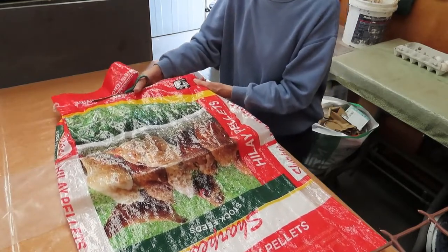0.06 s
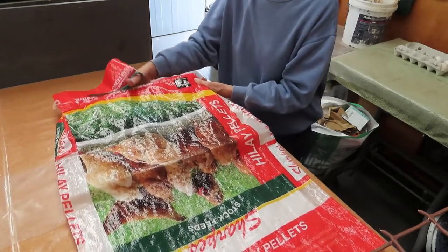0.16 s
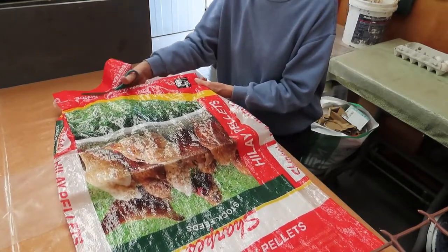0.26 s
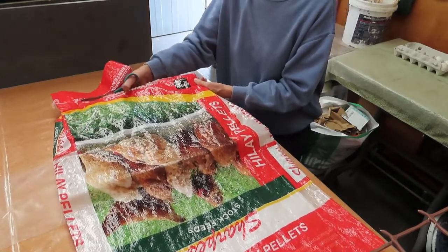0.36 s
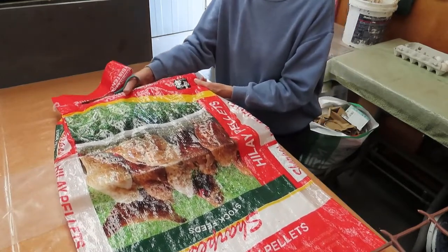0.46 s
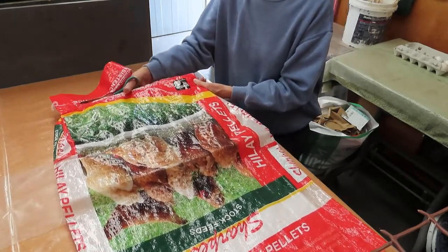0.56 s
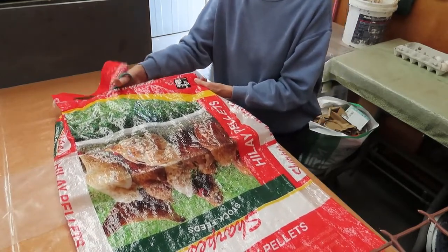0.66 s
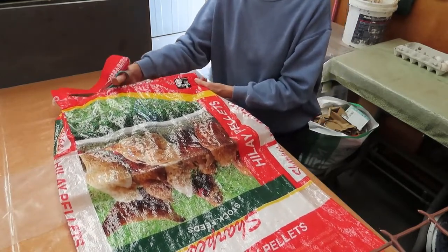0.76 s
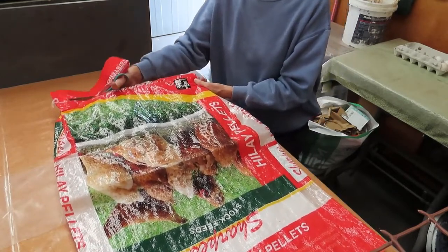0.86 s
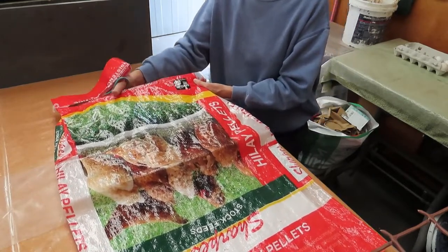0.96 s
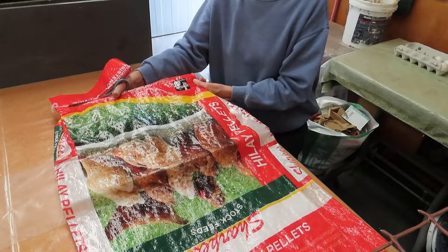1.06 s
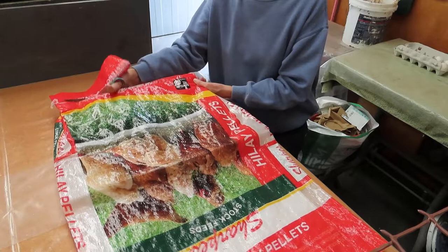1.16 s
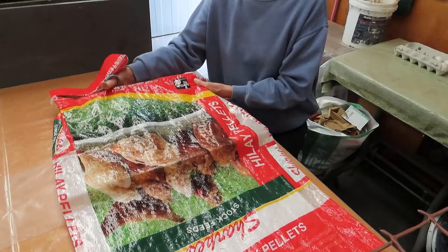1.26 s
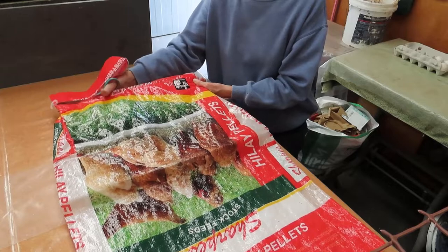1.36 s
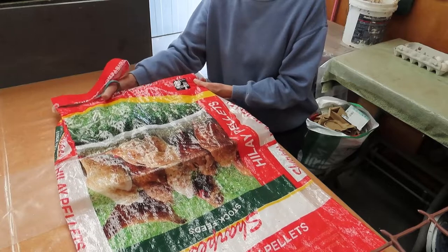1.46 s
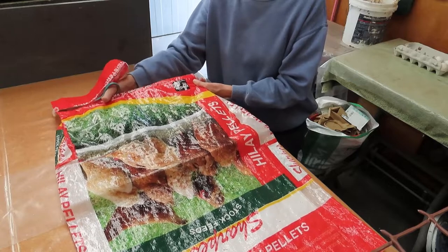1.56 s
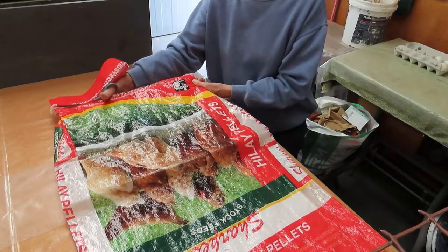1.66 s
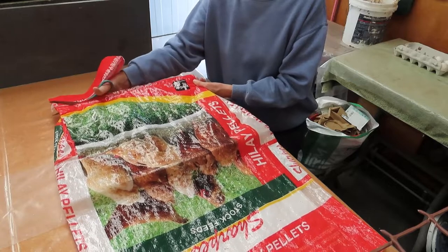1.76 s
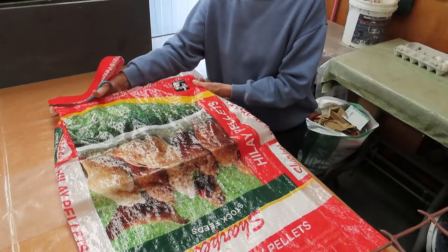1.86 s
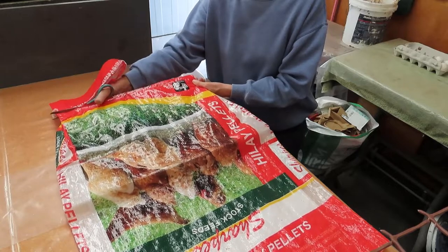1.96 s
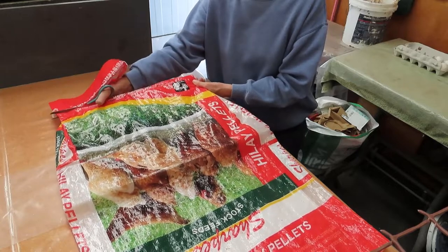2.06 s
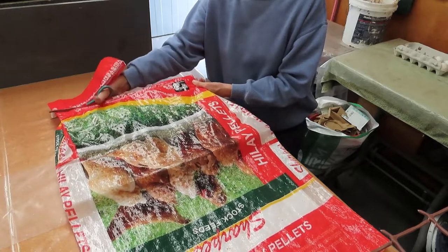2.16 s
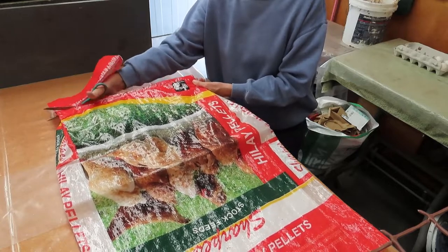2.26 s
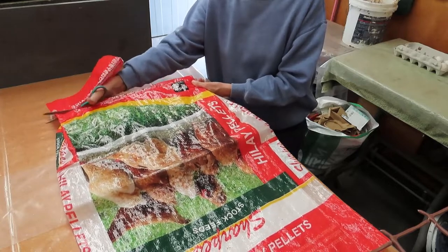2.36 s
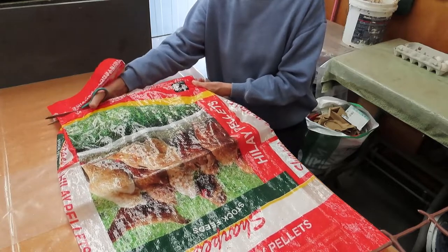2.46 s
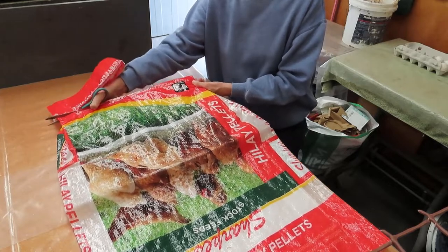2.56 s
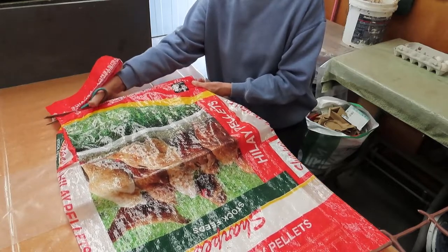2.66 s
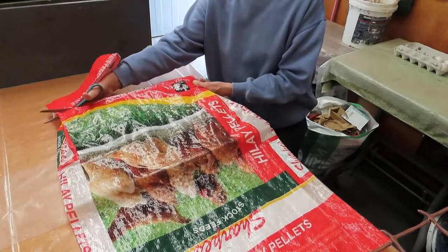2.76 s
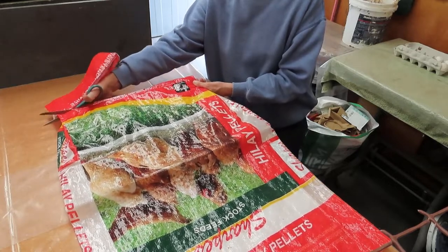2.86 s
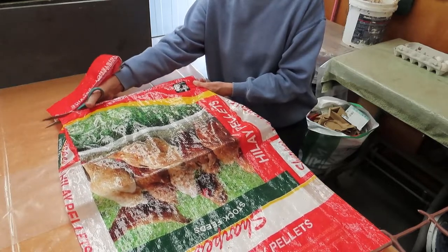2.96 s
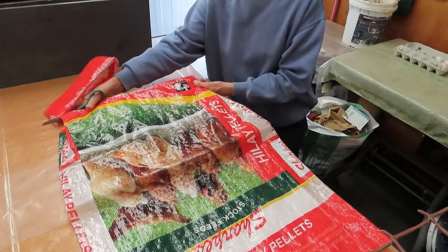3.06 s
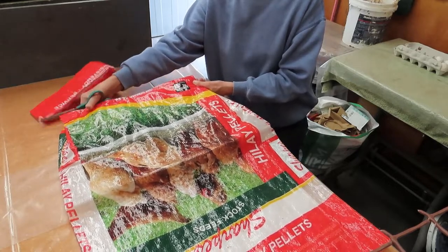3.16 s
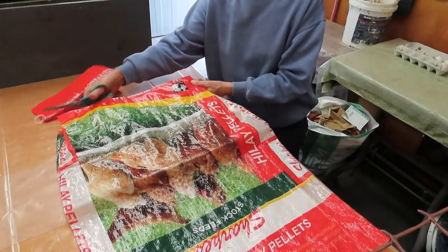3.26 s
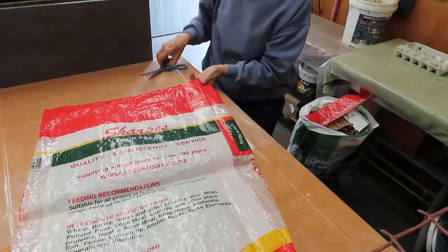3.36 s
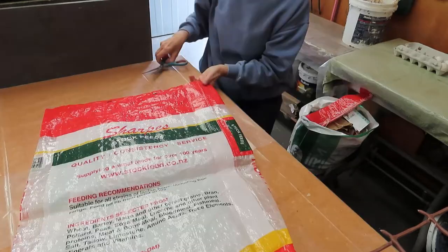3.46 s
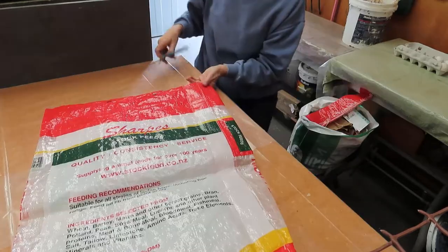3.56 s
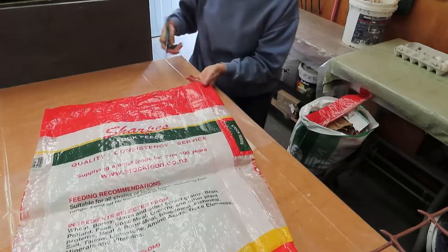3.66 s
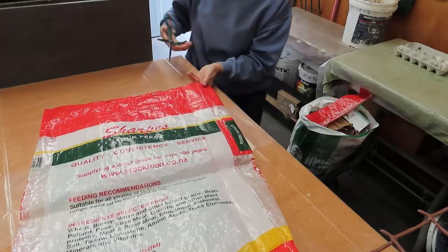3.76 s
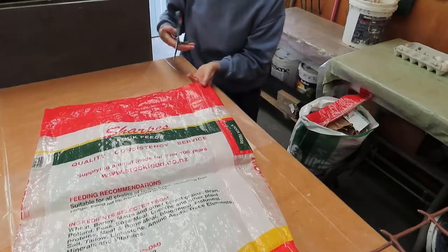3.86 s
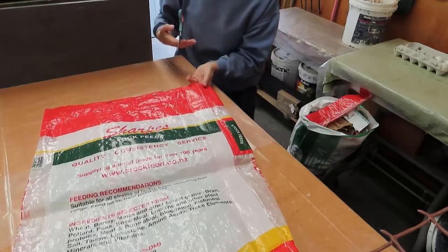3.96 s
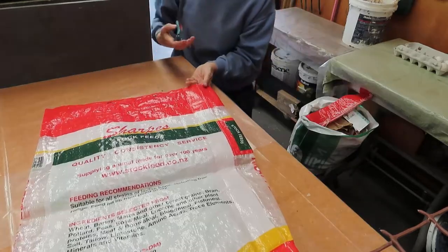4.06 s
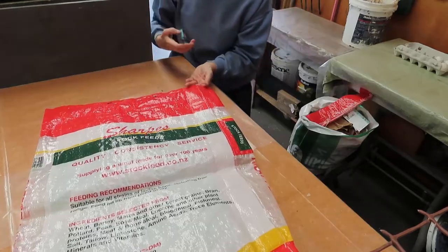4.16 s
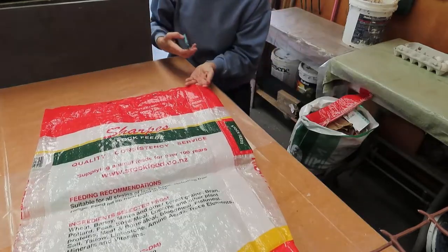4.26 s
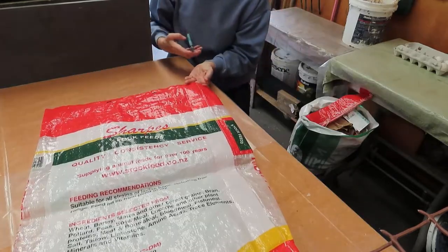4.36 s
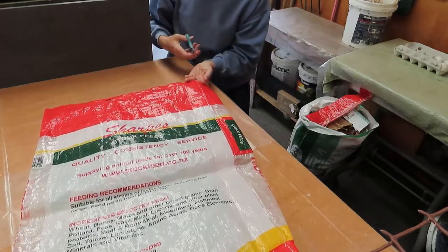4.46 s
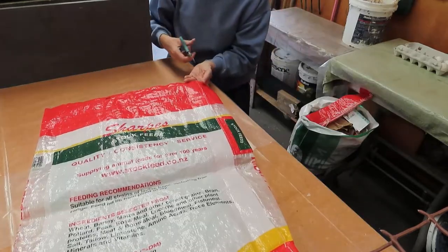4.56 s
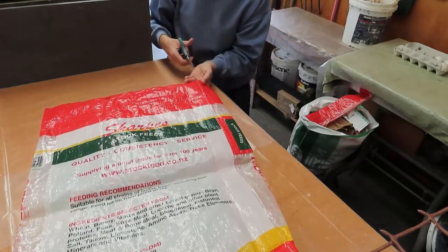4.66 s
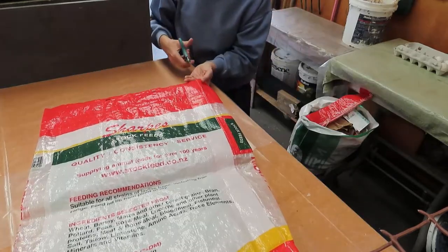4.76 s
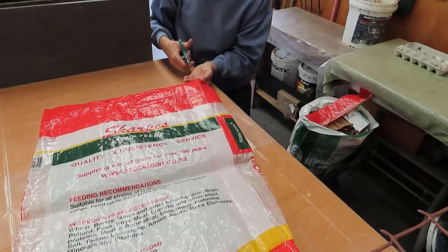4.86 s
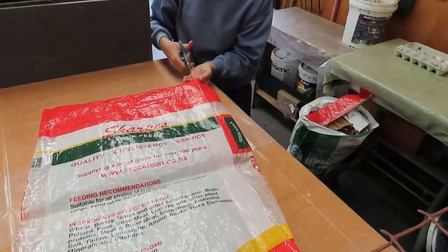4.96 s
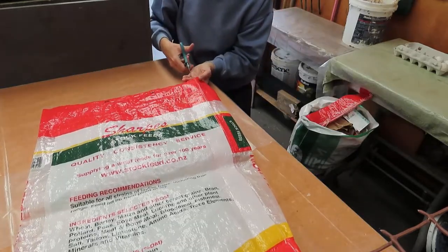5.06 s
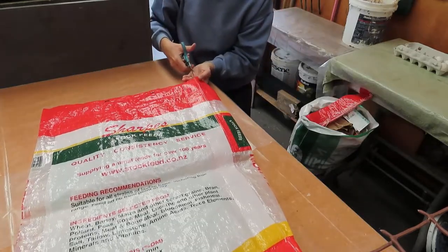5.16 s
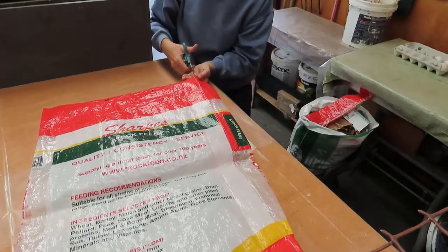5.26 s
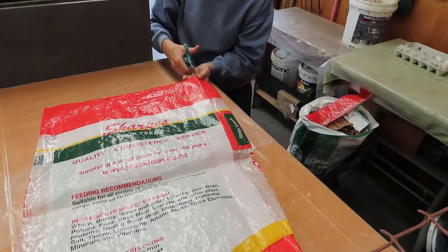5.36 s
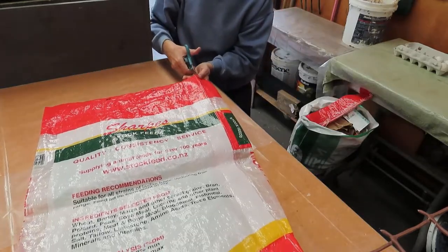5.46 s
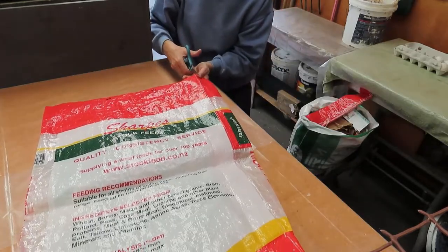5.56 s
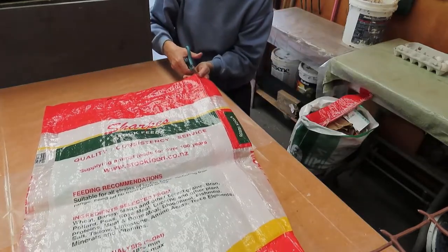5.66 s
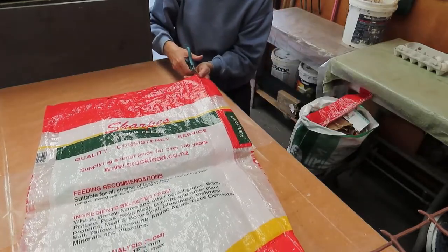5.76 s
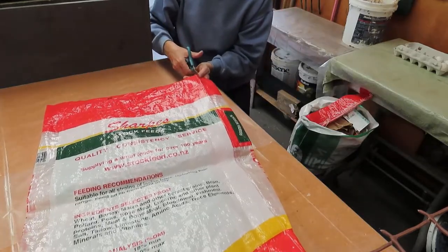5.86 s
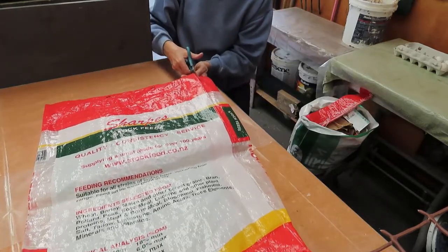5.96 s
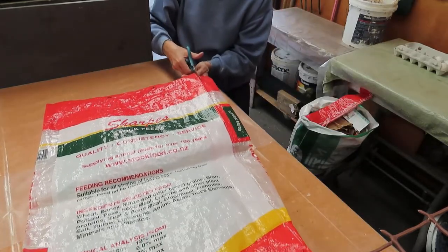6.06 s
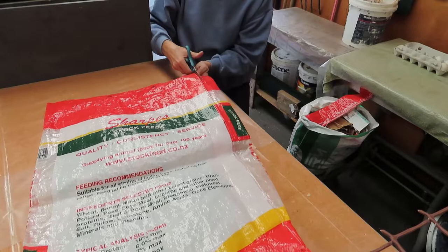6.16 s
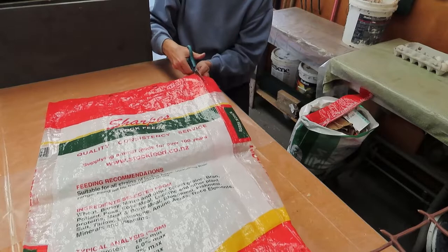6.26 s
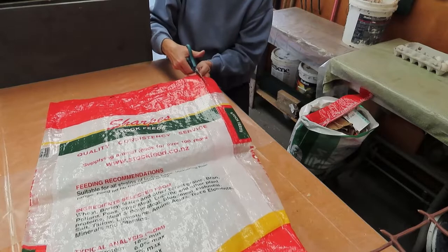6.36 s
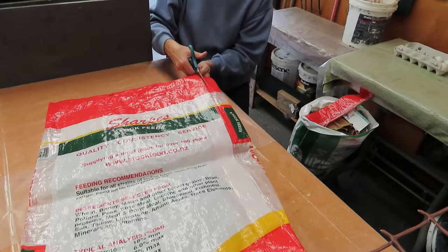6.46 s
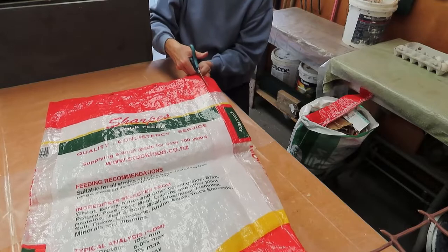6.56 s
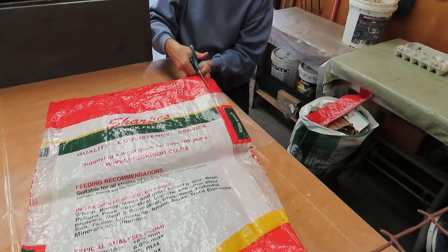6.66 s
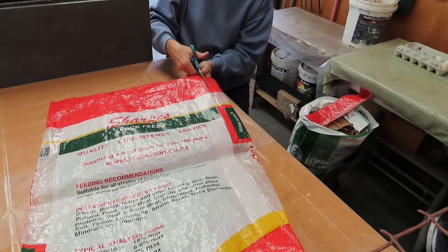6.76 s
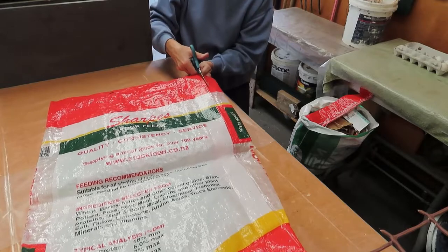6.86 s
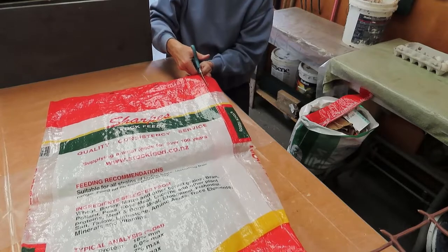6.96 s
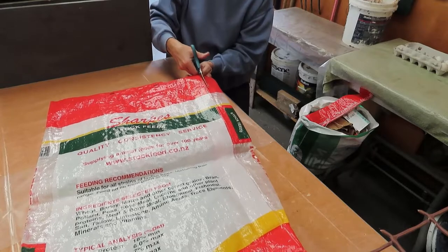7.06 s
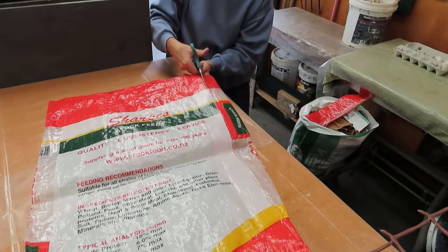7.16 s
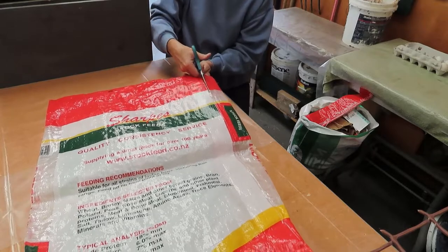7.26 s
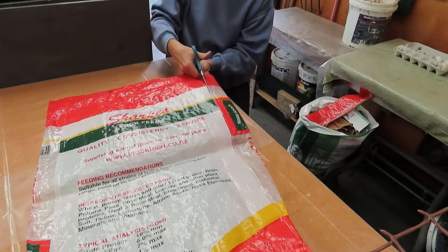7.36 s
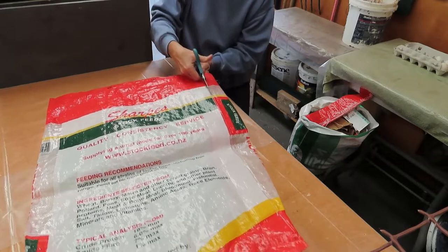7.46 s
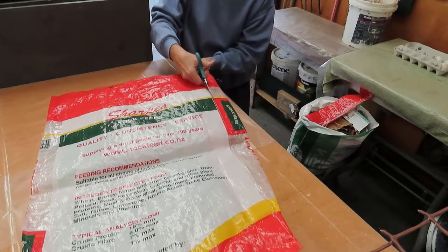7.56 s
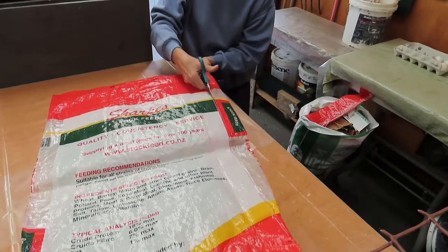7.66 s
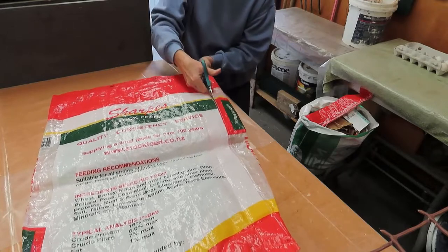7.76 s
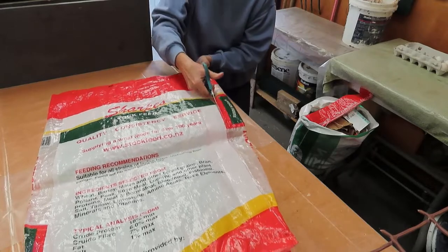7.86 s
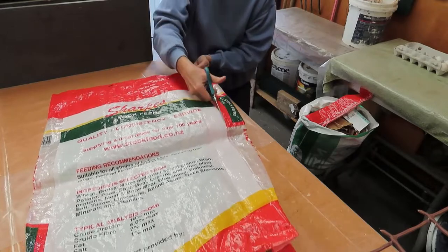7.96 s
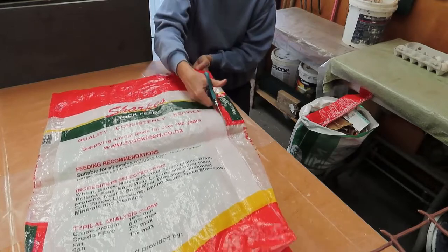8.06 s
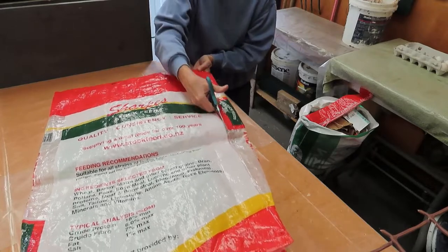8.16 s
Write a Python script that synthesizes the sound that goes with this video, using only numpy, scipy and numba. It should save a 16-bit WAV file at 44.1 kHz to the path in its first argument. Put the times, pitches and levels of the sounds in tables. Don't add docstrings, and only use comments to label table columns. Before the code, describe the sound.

Crisp plastic crackle and thread pops as a stiff sack is cut, a quieter pause while it is turned, then louder snips and dense ripping.

```python
import sys
import numpy as np
from scipy import signal
from scipy.fft import rfft, irfft, next_fast_len
from scipy.io import wavfile
from numba import njit

SR = 44100
rng = np.random.default_rng(int(sys.argv[2]) if len(sys.argv) > 2 else 0)


def convert_level_to_amplitude(level_db):
    exponent = np.asarray(level_db, float) / 20
    return 10 ** exponent


def pcm_store(signal):
    levels = np.round(np.clip(np.atleast_2d(signal), -1, 1) * 32767)
    wavfile.write(sys.argv[1], SR, levels.astype(np.int16).T)


N = 362061

TURNED_S = 3.6
TICK_PER_CREASE = 0.87


def colour(x, points):
    size = next_fast_len(len(x))
    hz, db = np.transpose(points)
    bins_hz = np.arange(size // 2 + 1) * SR / size
    gain = convert_level_to_amplitude(np.interp(np.log(bins_hz + 1), np.log(hz), db))
    return irfft(rfft(x, size) * gain, size)[:len(x)]


def unit(x):
    return x / np.sqrt(np.mean(x ** 2))


@njit
def ring(count, start, hz, cycles, size, place, glide):
    out = np.zeros((2, count))
    for g in range(len(start)):
        tau = cycles * SR / hz[g] / 4
        phase, step = 0., 2 * np.pi * hz[g] / SR
        for k in range(min(int(9 * tau) + 2, count - start[g])):
            fade = np.exp(-k / tau)
            v = size[g] * np.e * k / tau * fade * np.sin(phase)
            phase += step * (1 + glide * fade)
            out[0, start[g] + k] += v
            out[1, start[g] + k] += v * place[g]
    return out


def grains(s, hz, db, place, cycles, glide=0.15):
    start = np.clip(s * SR, 0, N - 1).astype(np.int64)
    return ring(N, start, np.clip(hz, 40, .3 * SR), 1. * cycles, convert_level_to_amplitude(db), place, 1. * glide)


def threads():
    # t/s, boom level/dB, sheet f/Hz, crease level/dB re boom, crease f/Hz
    hem_threads = [(0.3832, -40, 1500.0, 4, 2270.0), (0.3977, -33.0, 1170.0, -8.0, 2730.0),
                   (0.4045, -32, 1210.0, 1.0, 2920), (0.4111, -28.5, 786, 1.5, 2070),
                   (0.422, -34, 720.0, -12, 2980.0), (0.4385, -40, 870.0, 3, 2700.0),
                   (0.4453, -25.5, 770, 0, 2780), (0.461, -37, 1430.0, 1, 2840.0),
                   (0.4639, -27, 720.0, -7, 3600), (0.4838, -25.5, 1360.0, -9.5, 4080),
                   (0.4884, -35, 750.0, 6, 2520.0), (0.498, -42.5, 1440.0, 10, 2180),
                   (0.9208, -41, 1890.0, 2.0, 2170.0), (0.9272, -44.0, 1890.0, 1.0, 2050.0),
                   (0.9313, -29.0, 880, -13, 2220.0), (0.9418, -30, 790.0, -10, 2350.0),
                   (0.948, -31, 1490.0, 1, 2240), (0.952, -39, 1480, -6, 2760.0),
                   (0.9656, -32.5, 1100, 5, 2800), (0.9693, -27, 700, 0.5, 3100),
                   (0.9773, -38, 1890.0, 13.0, 2880), (0.9898, -30, 1090, 1, 3130),
                   (0.9955, -26, 1890.0, -2, 2580), (1.025, -38, 1550.0, 7, 2820.0),
                   (1.0276, -31.5, 760, -5, 2430), (1.0335, -40, 1470, 11, 2380.0),
                   (1.0375, -28, 1310, -14, 2250.0), (1.0426, -37, 1480.0, -1, 3740.0),
                   (1.0486, -45, 1260.0, 3.0, 2700.0), (1.9032, -52.0, 880.0, 6, 2760.0),
                   (1.9068, -53.0, 1390.0, 15, 2830.0), (1.919, -45, 940.0, -5, 3640.0),
                   (1.9224, -49, 720.0, -5.0, 4370.0), (1.9267, -44, 1250.0, -3.0, 4430.0),
                   (1.9373, -33, 1080, 6, 3180), (1.9525, -31, 1080.0, 7, 2440),
                   (1.957, -18, 856, 2.5, 2500.0), (1.9746, -23, 1030.0, -6, 4470),
                   (1.9955, -29, 1350.0, 3.5, 3100), (2.004, -33, 1320.0, 2.0, 3380.0)]
    corner_threads = [(5.9404, -35, 1150.0, -12, 2500.0), (5.9454, -32, 940.0, -15, 2000.0),
                      (5.954, -17, 1100, -13, 2170), (5.9614, -20.5, 1180.0, -5, 2570),
                      (5.9694, -23, 1590.0, -9, 2420.0), (5.9772, -19.5, 1000.0, -15, 1980),
                      (5.9851, -21.5, 990, -4, 2980.0), (5.995, -18, 1320.0, -17, 2490.0),
                      (6.0092, -42, 980, -4, 2730.0), (6.0205, -42, 1060.0, -3.0, 2900),
                      (6.0246, -20.5, 960, -8, 2500.0), (6.0291, -29, 1280, 3, 3080),
                      (6.0351, -21.5, 1550.0, -11, 3090.0), (6.0401, -26, 760, -2, 1980),
                      (6.0548, -44, 1180.0, -12, 2350.0), (6.1143, -28, 1450, -7.0, 2610.0),
                      (6.1199, -15.5, 1010, -19, 2570.0), (6.1286, -34, 925, 1, 3050),
                      (6.1343, -14.5, 920, -20, 2440.0), (6.1436, -18, 1380, -8, 2710.0),
                      (6.1547, -19.5, 920, -7, 2500), (6.1663, -35, 960, 5, 2310),
                      (6.1759, -25, 1890.0, -9, 2050), (6.4416, -25, 770, -10, 2330.0),
                      (6.4486, -24.5, 1433, -10, 2240), (6.4551, -29, 1350.0, -18, 2290.0),
                      (6.4645, -14, 900, -8.0, 2930), (6.4706, -28, 1100.0, 2, 2790.0),
                      (6.4754, -31, 980.0, -6, 2740), (6.4807, -33, 920.0, -1.0, 2900),
                      (6.4871, -40, 1040.0, -4, 3080), (6.4962, -32, 766, -9, 2920),
                      (6.5152, -19.5, 1360, -2, 2940), (6.5197, -29, 1300.0, -7, 3120.0),
                      (6.5276, -31, 1160, 6, 3140), (6.5316, -20, 900, -13, 3000),
                      (6.548, -33, 810.0, 3, 2900.0), (6.555, -21, 1010, -2, 3180),
                      (6.5629, -22, 1520, -11, 3100), (6.5764, -47, 1530.0, -17, 2920.0)]
    rip_threads = [(7.1445, -42.0, 1000.0, 11, 2950.0), (7.1502, -25, 1890.0, 5.5, 2050),
                   (7.1602, -22, 1010, 8.5, 2770), (7.1846, -27, 1380, 13, 3050.0),
                   (7.1891, -26, 850.0, 11.0, 2930), (7.1917, -26, 1420.0, 5, 3330),
                   (7.2001, -25, 1450.0, 8, 2900), (7.2095, -23.5, 1380.0, 4.0, 2820.0),
                   (7.2147, -29, 1130.0, 7, 3000.0), (7.2194, -20, 1710.0, 3, 2850.0),
                   (7.2255, -24.5, 805, 2, 2980.0), (7.233, -18, 850.0, 1, 2750.0),
                   (7.238, -24.5, 860, 0, 2330), (7.2461, -18.5, 770, 2, 2030),
                   (7.253, -22, 1460, -3, 3150.0), (7.258, -30, 1130.0, -13, 1980),
                   (7.2646, -33, 1210.0, -11, 2010.0), (7.3495, -31, 1600.0, -6, 2260),
                   (7.373, -31, 1480.0, -5.0, 2090.0), (7.389, -31, 1030.0, -24, 2700),
                   (7.394, -15, 940, -9, 2420), (7.406, -28.0, 1730.0, 5, 2090.0),
                   (7.4099, -22, 795, -1, 2650), (7.4123, -25, 940.0, 3, 2830.0),
                   (7.4181, -28, 890.0, -2, 2440), (7.4378, -20, 880.0, -10, 2240.0),
                   (7.458, -27, 990.0, -4.0, 2370.0), (7.475, -25.5, 930, -0.5, 2090.0),
                   (7.4829, -28, 920.0, -2, 2300.0), (7.4971, -32, 960.0, 8.5, 2380)]
    glide_threads = [(7.5144, -31, 1040.0, 6, 2080), (7.5333, -27.0, 710, 0, 2330.0),
                     (7.5453, -29, 810, -2, 2620.0), (7.5563, -22.5, 1460.0, -7, 2510.0),
                     (7.5847, -40, 680.0, 14, 2430), (7.6121, -27, 1310.0, -6, 3430.0),
                     (7.6185, -26.5, 1490, -5, 3180), (7.6514, -32, 1890.0, 2, 3350),
                     (7.6675, -21.5, 1530, -4.0, 2220), (7.683, -26, 1600.0, -7, 2000),
                     (7.713, -30.5, 1200.0, 6.5, 3440), (7.7217, -27, 1780.0, 0, 2430.0),
                     (7.7384, -30, 930.0, -11, 3470.0), (7.764, -32.0, 1230.0, 5, 2270),
                     (7.7856, -29, 705, -2.0, 2400.0), (7.803, -28.0, 1230.0, -17, 2440.0),
                     (7.8115, -33, 1510.0, 1.0, 2000.0), (7.838, -37, 1380.0, -10, 3770.0),
                     (7.8517, -22, 760.0, -16, 3220.0), (7.8616, -22.0, 930, -17, 2500.0),
                     (7.8721, -26, 930.0, -7, 2000.0), (7.8887, -30.5, 1820.0, 7, 3610.0),
                     (7.9064, -27, 930, 4, 2250), (7.9187, -28, 1040.0, -8.0, 3790.0),
                     (7.934, -29, 940.0, -1, 2000.0), (7.9574, -23, 730, -2, 2000.0),
                     (7.9724, -24, 840, -9.0, 2010), (8.0832, -23.0, 925, -16, 2520.0),
                     (8.0985, -23.5, 1110, -3, 2810), (8.1078, -29, 970.0, 5, 3420),
                     (8.1178, -23, 1240, -11, 2680.0), (8.1577, -19.0, 720, -7.0, 2390),
                     (8.1674, -21.5, 870, -3, 2540), (8.1956, -19.5, 875, -11.0, 3540)]
    snips = [
        (4.4312, -23.5, 965, -6, 3110),
        (6.3007, -16, 1130, -7, 2770),
        (6.3092, -24.5, 1000, -3, 2500),
        (6.712, -23, 950, -8, 3000),
        (6.7149, -22.5, 980, -1.5, 3120),
        (6.9453, -16.5, 1010, -2, 2900),
    ]
    groups = [(hem_threads, -6.5), (corner_threads, -10.5), (rip_threads, -17.5), (glide_threads, -11),
              (snips, -9.5)]
    out = 0
    for table, tick_db in groups:
        s, db, hz, crease_db, crease_hz = np.transpose(table)
        place, over, low, high, tick = rng.standard_normal((5, len(s)))
        top_db = db + tick_db + TICK_PER_CREASE * crease_db
        overtone_hz = 1.83 * hz * np.exp(0.13 * over)
        low_tick_hz = 5600 * np.exp(0.19 * low)
        high_tick_hz = 9000 * np.exp(0.22 * high)
        out = out + grains(s, hz, db - 2.0, place, cycles=2.47, glide=0.03)
        out += grains(s + 0.000946, overtone_hz, db - 7, place, cycles=2.6)
        out += grains(s - .0002, crease_hz, db + crease_db - 1.5, place, cycles=6.1, glide=0.048)
        out += grains(s - .0003, low_tick_hz, top_db + 1.6 * tick, place, cycles=3.3)
        out += grains(s + .0006, high_tick_hz, top_db - 5, place, cycles=6.8)
    return out


def pop_rows():
    # t/s, boom level/dB, sheet f/Hz, crease level/dB re boom
    hem_pops = [(0.0, -31, 730, -3.5), (0.026, -25.5, 1030, -19), (0.065, -32.5, 1560, -30),
                (0.185, -33, 1130, -11), (0.204, -31, 1380, -11), (0.299, -29, 1720, -10),
                (0.64, -36.5, 1000, 0.5), (0.738, -40, 1220, 3), (1.182, -41, 1060, -15),
                (1.241, -50.5, 1320, 14), (1.247, -30, 784, -26), (1.398, -29, 1090, -1.5),
                (1.416, -37.5, 1100, 2.5), (1.488, -40, 1290, 6), (1.519, -32.5, 1500, -9),
                (1.548, -22, 1410, -5), (1.567, -23, 1430, -7.5), (1.872, -40, 1190, -25),
                (2.082, -35, 770, 2), (2.18, -29.5, 1040, -37), (2.266, -33.5, 1460, -14),
                (2.307, -44, 1180, -0.5)]
    offcut_pops = [(2.434, -29.5, 1370, 5.5), (2.452, -27, 1500, 0), (2.497, -35.5, 1290, 6.5),
                   (2.517, -27, 1150, 2.5), (2.715, -47.5, 1400, 1.5), (2.795, -44, 1030, 1),
                   (2.952, -49, 1190, 8), (2.979, -36.5, 1010, 4), (3.001, -35, 1340, -2),
                   (3.048, -28.5, 1140, 3.5), (3.094, -27, 1290, 1), (3.097, -18, 940, -2),
                   (3.176, -32.5, 1080, -29), (3.291, -48.5, 1100, 12), (3.304, -40.5, 1310, -7),
                   (3.727, -55.5, 1200, 9.5), (3.756, -50.5, 1230, 1), (3.84, -67.5, 1200, 18)]
    corner_pops = [(3.944, -34.5, 960, -8.5), (4.238, -53, 1320, -1.5), (5.216, -46.5, 1540, -4),
                   (5.301, -27.5, 1280, -8), (5.517, -43.5, 820, -15), (5.529, -45, 1010, -8),
                   (5.706, -40.5, 760, -4), (5.739, -30.5, 1020, -1), (5.749, -33, 800, -4),
                   (5.806, -33.5, 850, -2.5), (5.91, -20.5, 1000, -26), (5.926, -38, 1410, -25),
                   (5.936, -21.5, 980, -8), (6.103, -27, 1010, -18), (6.426, -28.5, 1000, -4.5),
                   (6.705, -38.5, 1600, 8), (6.849, -46.5, 1380, -1), (6.941, -36, 1120, 11)]
    rip_pops = [
        (7.132, -33.5, 990, -4),
        (7.147, -25, 1700, 0.5),
    ]
    groups = [(hem_pops, -0.5), (offcut_pops, -1.5), (corner_pops, -5), (rip_pops, -7.5)]
    rows = [np.column_stack([table, np.full(len(table), tick_db)]) for table, tick_db in groups]
    rows = np.concatenate(rows).T
    rows[4] += TICK_PER_CREASE * rows[3]
    return rows


def pops():
    # f ratio re boom, level/dB re boom, crease f/Hz, crease level/dB, tick f/Hz
    splinters = [(2.03, -6.5, 2860, 0.5, 5420), (0.7, -5, 2075, -2, 6450), (1.87, -3, 4350, -0.5, 8060),
                 (1.22, -8.5, 2705, -2.5, 11000)]
    s, db, hz, crease_db, tick_db = pop_rows()
    c = rng.standard_normal((4 * len(splinters) + 1, len(s)))
    place = c[-1]
    out = grains(s + 0.00031, hz, db - .8, place, cycles=2.33, glide=0.1)
    for k, (ratio, boom_db, crease_hz, part_db, tick_hz) in enumerate(splinters):
        delay, boom_vary, crease_vary, tick_vary = c[4 * k:4 * k + 4]
        late = s + .0004 * k * abs(delay)
        part_hz = ratio * hz * np.exp(0.14 * boom_vary)
        note_hz = crease_hz * np.exp(0.1 * crease_vary)
        out += grains(late + 0.00048, part_hz, db + boom_db, place, cycles=2.24)
        out += grains(late, note_hz, db + crease_db + part_db, place, cycles=3.0, glide=0.075)
        out += grains(late, tick_hz * np.exp(0.11 * tick_vary), db + tick_db - 7.5, place, cycles=5.9)
    return out


def handling():
    # start t/s, hold t/s, boom level/dB, crease level/dB re boom, fizz level/dB re boom
    strokes = [(0, 0.059, -45.5, -0.5, -17), (0.169, 0.14, -46.5, 1, -7.5), (0.399, 0.071, -39, -4.5, -7.5),
               (0.633, 0.12, -44, -1, -14.5), (0.92, 0.095, -41, 1.5, -13.5), (1.163, 0.09, -44.5, 2, -15),
               (1.386, 0.058, -48, -7, -8.5), (1.53, 0.15, -54.5, -1, -13),
               (1.709, 0.15, -45.5, -4.5, -14.5), (1.936, 0.028, -33.5, 1, -3),
               (2.194, 0.1, -47.5, 2, -10.5), (2.35, 0.078, -57.5, 3, -4), (2.427, 0.032, -49.5, 5, -3),
               (2.75, 0.03, -53.5, 4.5, -4), (2.882, 0.018, -56, -3, -19), (2.982, 0.078, -49.5, 7, 4.5),
               (3.29, 0.14, -60, 2.5, -3.5), (5.237, 0.25, -51, -8, -22), (5.496, 0.042, -53.5, -3, -20),
               (5.716, 0.086, -68, 5, 10), (5.921, 0.081, -34, -4, -12), (6.122, 0.033, -37.5, 4.5, -6),
               (6.451, 0.1, -36, -1.5, -13), (7.182, 0.065, -35.5, 7, -6.5)]
    # t/s, boom level/dB, crease level/dB re boom
    push_curve = [
        (7.33, -52, -2),
        (7.35, -31.5, -0.5),
        (7.44, -40, 1),
        (7.559, -35.5, 1.5),
        (7.64, -40, 1),
        (7.9, -30, -2.5),
        (8.01, -38, -2.5),
        (8.1, -31.5, -4),
        (8.21, -37, -3.5),
    ]
    rise_db_s, sag_db_s = 696, 12.5
    fall_db_s = (252, 257, 291)
    rest_db = np.array((-68.5, -67.5, -78.5))
    glide_fizz_db = -11
    now = np.arange(N) / SR
    power = convert_level_to_amplitude(2 * rest_db)[:, None] * np.ones(N)
    for start, hold, db, crease_db, fizz_db in strokes:
        near = slice(int(max(start - .1, 0) * SR), int((start + hold + .3) * SR))
        t = now[near] - start
        held = np.minimum(rise_db_s * t, -sag_db_s * np.minimum(t, hold))
        fall = np.outer(fall_db_s, np.maximum(t - hold, 0))
        register_db = db + np.array([[0], [crease_db], [fizz_db]])
        power[:, near] += convert_level_to_amplitude(2 * (register_db + held - fall))
    s, db, crease_db = np.transpose(push_curve)
    push = np.interp(now, s, db, left=-99)
    crease = push + np.interp(now, s, crease_db)
    power += convert_level_to_amplitude(2 * np.array([push, crease, crease + glide_fizz_db]))
    return np.sqrt(power)


def crackle():
    rate = 2600
    count = N * rate // SR
    s = np.sort(rng.uniform(0, N / SR, count))
    c = rng.standard_normal((7, count))
    size_db = np.minimum(4.0 * rng.exponential(1, count), 14)
    patch = [np.interp(s * 60, np.arange(N // 500), r) for r in rng.standard_normal((3, N // 500))]
    c[1:3] += .6 * np.array(patch[:2])
    size_db += 1.4 * patch[2]
    boom = grains(s, 1050 * np.exp(0.36 * c[1]), size_db + 3.9 * c[4], c[0], cycles=2.8)
    crease = grains(s, 2750 * np.exp(0.28 * c[2]), size_db + 2.9 * c[5], c[0], cycles=2.6)
    fizz = grains(s, 6800 * np.exp(0.33 * c[3]), size_db + 4.5 * c[6], c[0], cycles=4.0)
    layers = zip((boom, crease, fizz), handling())
    return sum(x / np.std(x[0]) * gain * convert_level_to_amplitude(-6.0) for x, gain in layers)


def radiate(x, turned):
    # f/Hz, level/dB
    sheet = [(250, -2), (500, -1.5), (800, -0.5), (1500, -0.5), (2100, -4.5), (3300, -3), (4000, -1),
             (8000, 1)]
    # f/Hz, level/dB
    doubled = [(300, 2), (580, -2), (920, -0.5), (1500, -0.5), (2200, -3.5), (3050, -2.5), (3900, 0),
               (8000, -0.5)]
    return np.where(turned, colour(x, doubled), colour(x, sheet))


def corner(x):
    # f/Hz, t60/s, level/dB
    modes = [(915, .3, -21), (950, .4, -22), (2050, .3, -25)]
    t = np.arange(SR // 2) / SR
    tone = sum(convert_level_to_amplitude(db) * unit(np.sin(2 * np.pi * hz * t) * convert_level_to_amplitude(-60 * t / t60)) for hz, t60, db in modes)
    pinched = np.interp(np.arange(N) / SR, [5.9, 6.1, 6.2, 6.3, 6.5, 6.6], [0, 1, 1, .4, .4, 0])
    return signal.oaconvolve(x * pinched, tone / np.sqrt(len(t)))[:N]


def thumps():
    # t/s, peak level/dB, f/Hz
    knocks = [
        (3.086, -43, 112),
        (3.37, -47, 567),
        (3.376, -45.5, 214),
        (3.938, -44, 366),
        (6.947, -37, 390),
    ]
    # t/s, level/dB
    slide = [(0.0, -54), (0.04, -62), (2.95, -61), (3.11, -39.5), (3.2, -71), (3.36, -67), (3.385, -52),
             (3.6, -61.5), (5.21, -62), (8.05, -47.5), (8.21, -40)]
    s, db, hz = np.transpose(knocks)
    out = grains(s, hz, db + 1.5, 0 * s, cycles=3.7, glide=0.033)
    table_top = [(50, -14), (110, -11.0), (200, -6.5), (330, -5.0), (600, -29.5), (2000, -74)]  # Hz, dB
    drag = colour(rng.standard_normal(N), table_top)
    drag_db = np.interp(np.arange(N) / SR, *np.transpose(slide))
    out[0] += unit(drag) * convert_level_to_amplitude(drag_db - 11.0)
    return out


def tails():
    # f/Hz, t60/s, level/dB
    bands = [(136, 0.18, -5), (336, 0.37, -2), (1000, 0.31, -2.5), (2500, 0.35, -1), (6050, 0.48, -2.5),
             (11100, 0.17, 0)]
    # f/Hz, side level/dB
    width = [(60, -31), (300, -16), (800, -38), (2500, -13), (8000, -3.5), (15000, 6)]
    t = np.arange(SR // 2) / SR
    early = 2.17 * convert_level_to_amplitude(-60 * t / 0.042) + 0.82 * np.exp(-((t - .0085) / 0.00038) ** 2)
    gap = np.clip(t / 0.00091 - 1.3, 0, 1)
    out = np.zeros((2, len(t)))
    for hz, t60, db in bands:
        band = signal.butter(2, [hz / 1.6, min(hz * 1.6, .45 * SR)], "bandpass", fs=SR, output="sos")
        fall = (convert_level_to_amplitude(-60 * t / t60) + early) * gap
        noise = signal.sosfilt(band, rng.standard_normal((2, len(t))))
        out += convert_level_to_amplitude(db) * noise * fall / np.sqrt(np.sum(fall ** 2))
    out[1] = colour(out[1], width)
    return out


def echo(x):
    slots, slot_s = 5, .0011
    slot = np.arange(N) / SR / slot_s % slots
    size = next_fast_len(N + SR // 2)
    out = 0
    for k in range(slots):
        distance = abs((slot - k + slots / 2) % slots - slots / 2)
        share = np.sqrt(np.clip(1 - distance, 0, 1))
        out = out + rfft(share * x, size) * rfft(tails(), size)
    return irfft(out, size)[:, :N]


def rumble():
    s, spread, hz, db = 1.5, 1.2, 40.5, -61
    band = signal.butter(2, [hz / 1.27, hz * 1.05], "bandpass", fs=SR, output="sos")
    deep = signal.sosfilt(band, rng.standard_normal(N))
    return convert_level_to_amplitude(db) * unit(deep) * np.exp(-((np.arange(N) / SR - s) / spread) ** 2)


def hum():
    # f/Hz, width/Hz, level/dB
    lines = [
        (103.2, 6.5, -67),
        (649, 2.7, -76.5),
    ]
    out = 0
    for hz, width, db in lines:
        band = signal.butter(1, [hz - width / 2, hz + width / 2], "bandpass", fs=SR, output="sos")
        out = out + convert_level_to_amplitude(db) * unit(signal.sosfilt(band, rng.standard_normal(N)))
    return out


def shed():
    # f/Hz, level/dB per Hz
    tone = [(20, -21), (38, -3.5), (60, 2), (74, -10.5), (116, -2), (216, -17.5), (560, -21), (660, -12.5),
            (740, -17.5), (1000, -16.5), (1400, -24.5), (8000, -42), (15000, -60)]
    # f/Hz, side minus mid level/dB
    width = [(60, -30), (110, -15), (200, -1), (380, 6), (700, -7.5), (1290, -5.5), (2380, -0.5),
             (4400, -4), (8120, -4), (15000, 0)]
    mid, side = (colour(rng.standard_normal(N), tone) for _ in range(2))
    return convert_level_to_amplitude(-59) / np.std(mid) * np.array([mid, colour(side, width)])


def scene():
    turned = np.arange(N) > TURNED_S * SR
    sack = np.array([radiate(x, turned) for x in pops() + threads() + crackle()])
    sack[0] += corner(sack[0])
    near = sack + thumps()
    lean = np.where(turned, 0.0065, 0.052)
    near[1] = convert_level_to_amplitude(-14.5) * np.gradient(near[1]) + lean * sack[0]
    mid, side = near + echo(near[0]) + shed()
    mid = mid + rumble() + hum()
    return convert_level_to_amplitude(1.0) * np.array([mid + side, mid - side])


def roll_off(x):
    return signal.sosfilt(signal.butter(12, 15950, fs=SR, output="sos"), x)


def record(dry):
    # f/Hz, level/dB
    capsule = [(20, -1), (11000, 0), (14500, 6), (16000, -3)]
    heard = np.array([colour(x, capsule) for x in dry])
    return roll_off(heard)


dry = scene()
out = record(dry)
pcm_store(out)
```